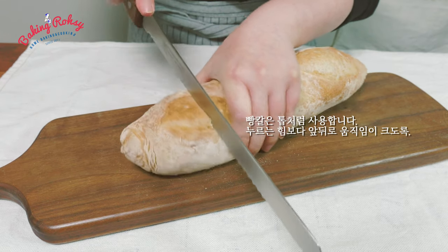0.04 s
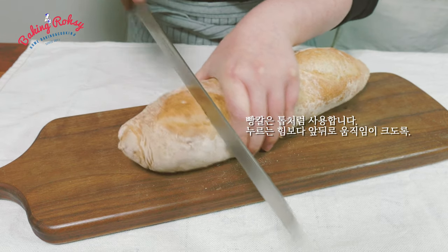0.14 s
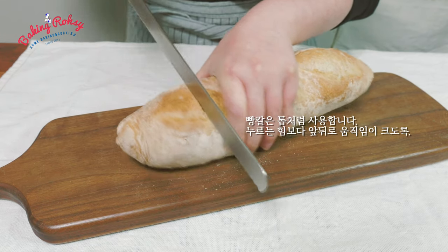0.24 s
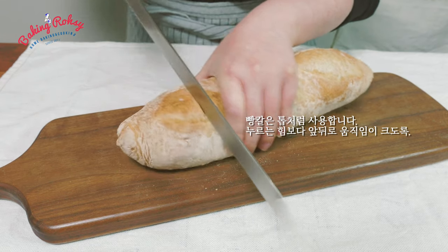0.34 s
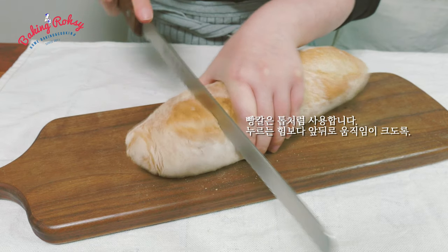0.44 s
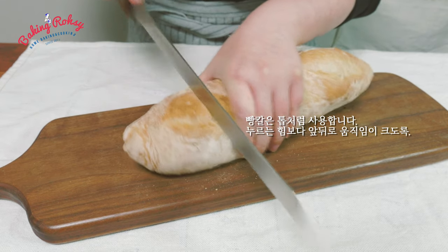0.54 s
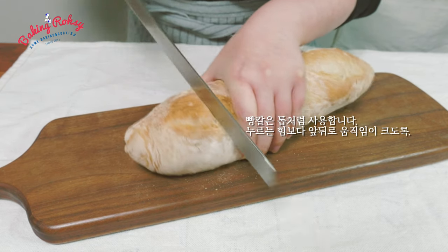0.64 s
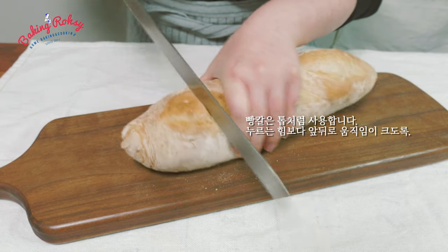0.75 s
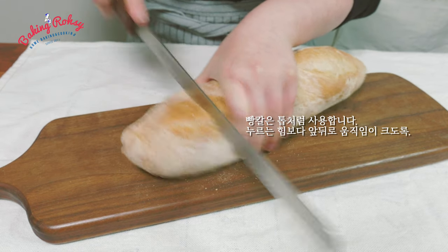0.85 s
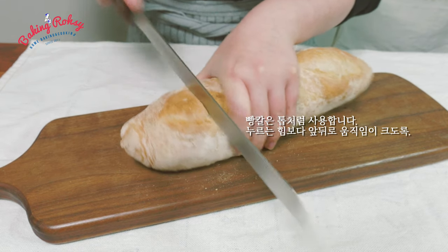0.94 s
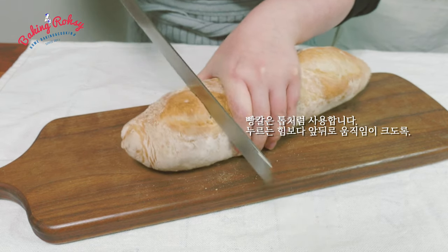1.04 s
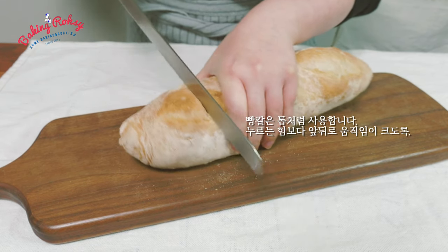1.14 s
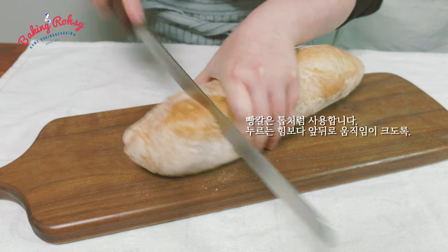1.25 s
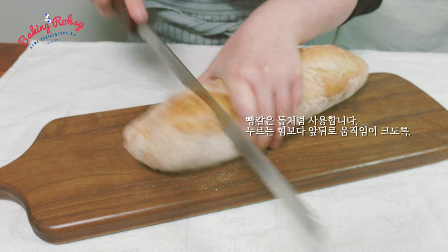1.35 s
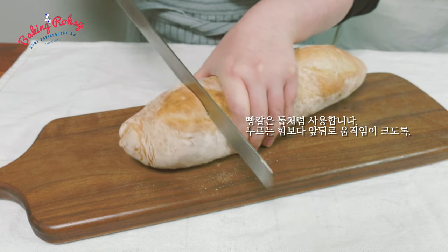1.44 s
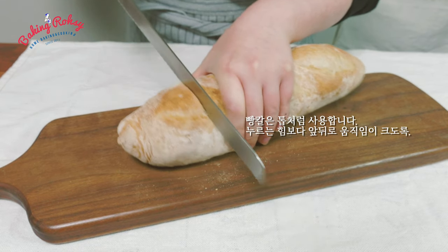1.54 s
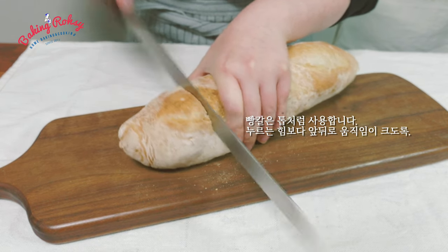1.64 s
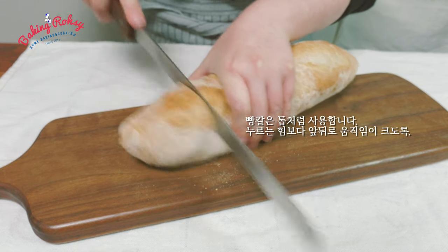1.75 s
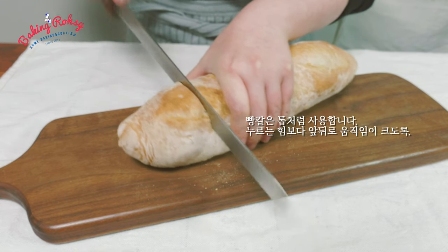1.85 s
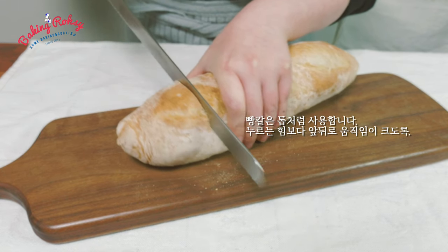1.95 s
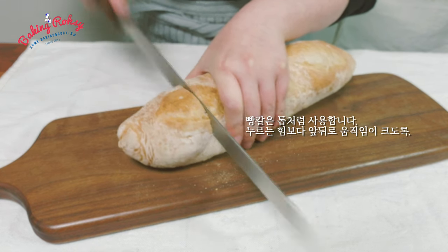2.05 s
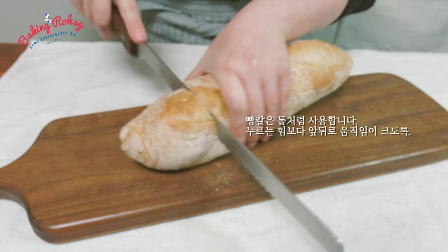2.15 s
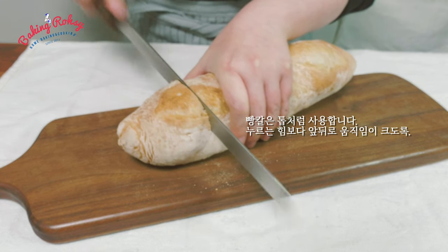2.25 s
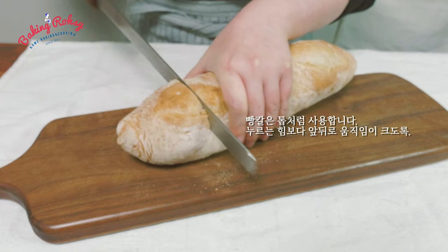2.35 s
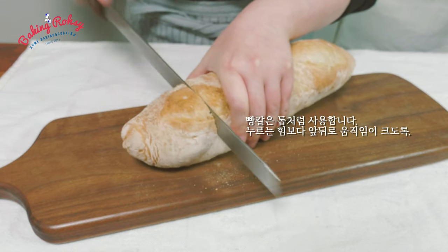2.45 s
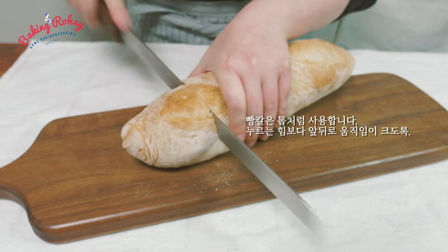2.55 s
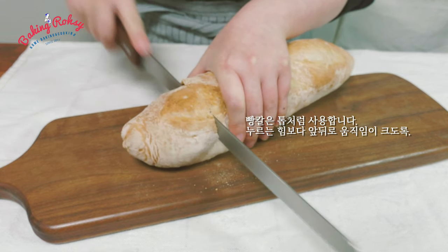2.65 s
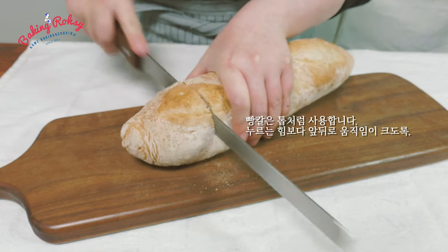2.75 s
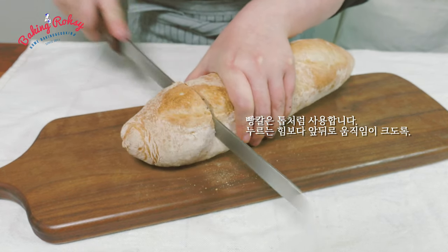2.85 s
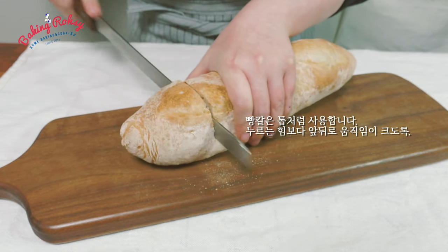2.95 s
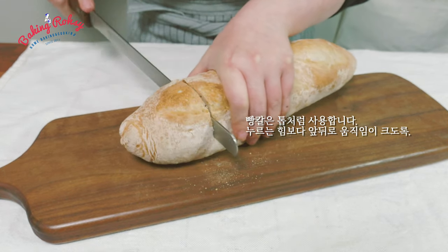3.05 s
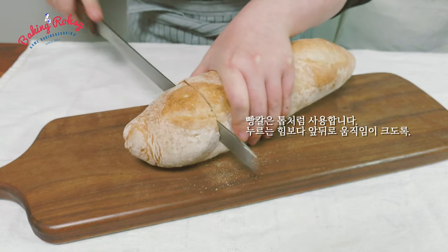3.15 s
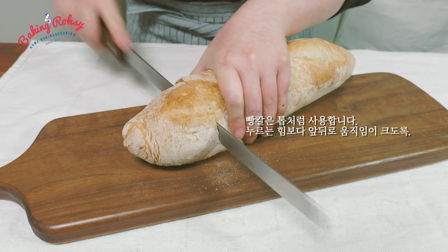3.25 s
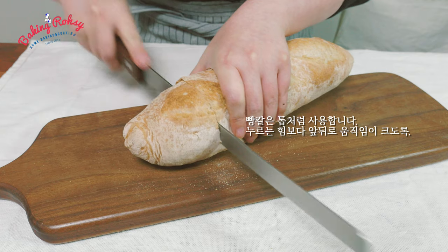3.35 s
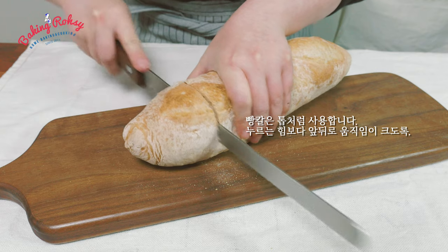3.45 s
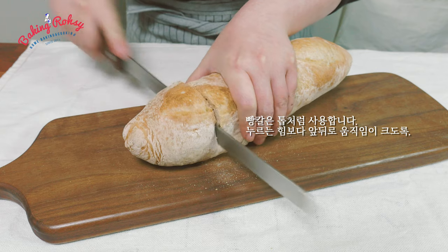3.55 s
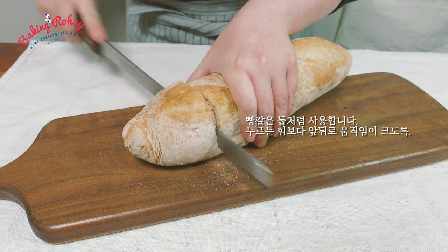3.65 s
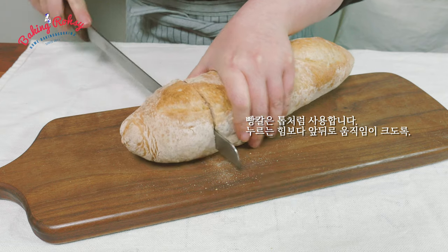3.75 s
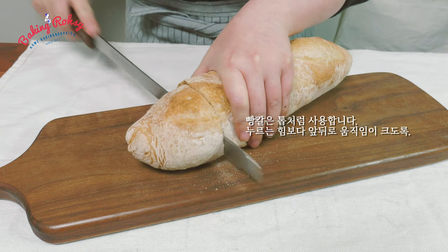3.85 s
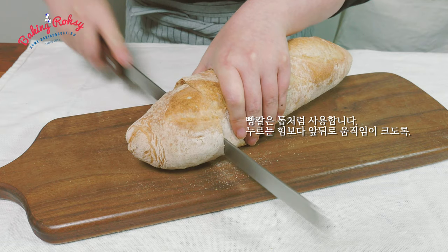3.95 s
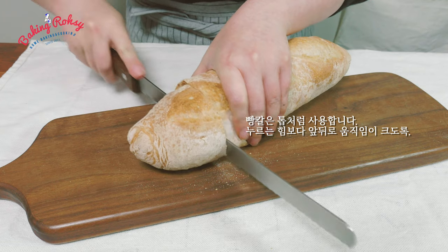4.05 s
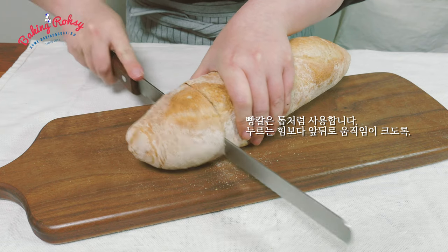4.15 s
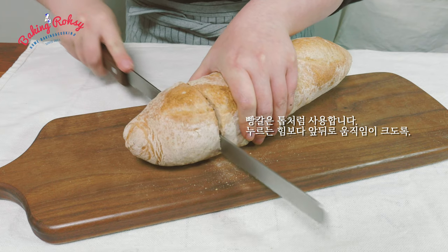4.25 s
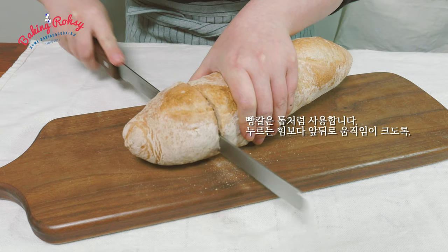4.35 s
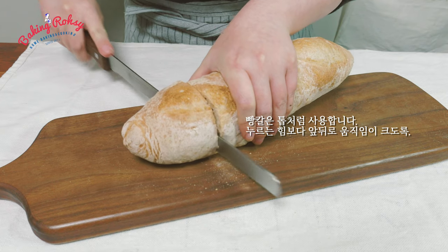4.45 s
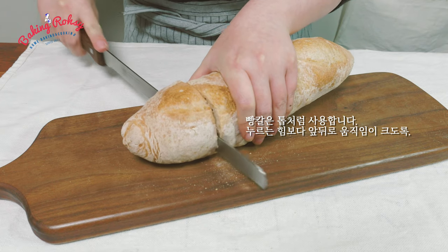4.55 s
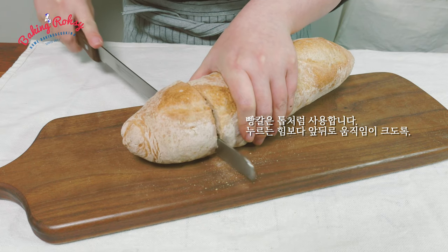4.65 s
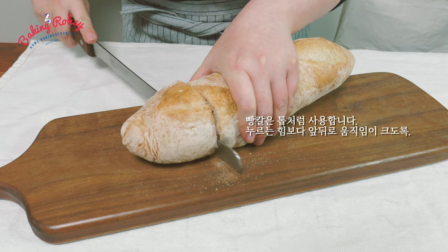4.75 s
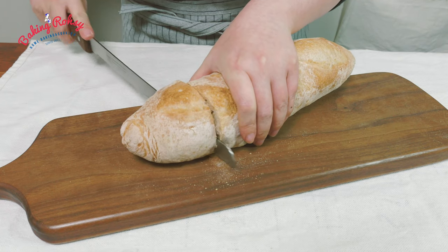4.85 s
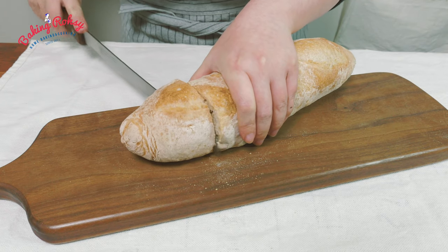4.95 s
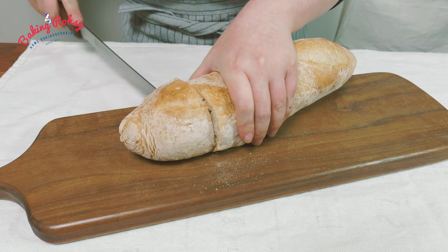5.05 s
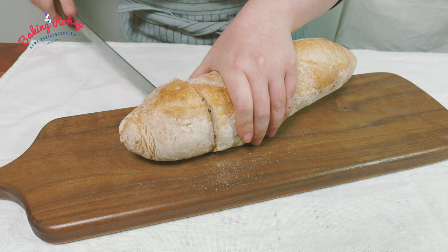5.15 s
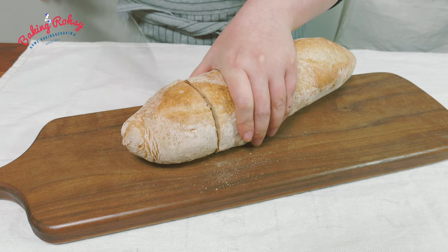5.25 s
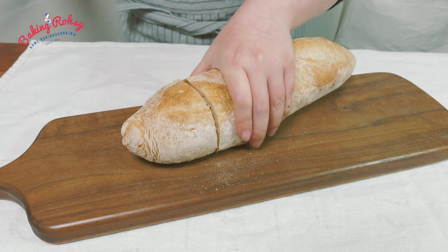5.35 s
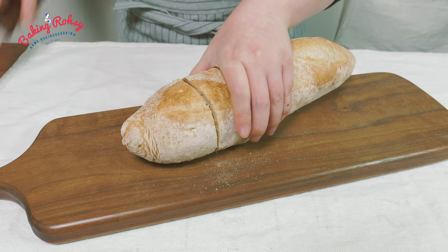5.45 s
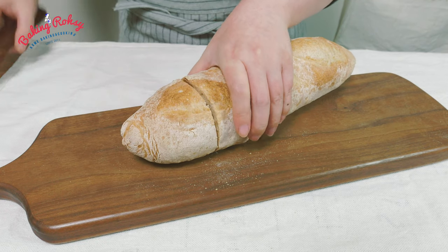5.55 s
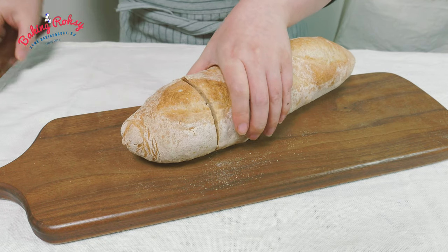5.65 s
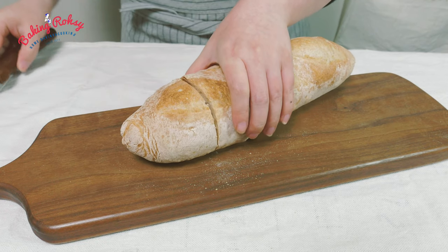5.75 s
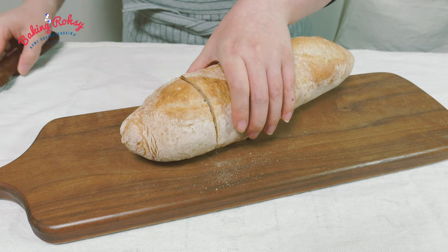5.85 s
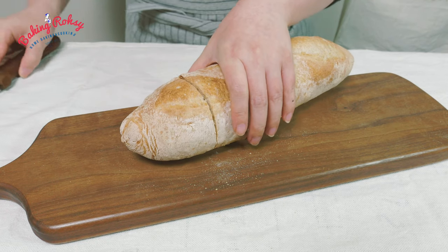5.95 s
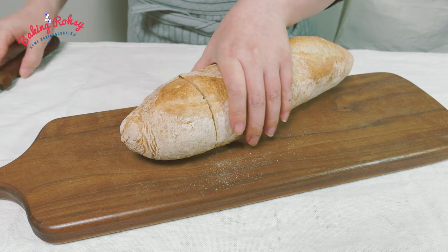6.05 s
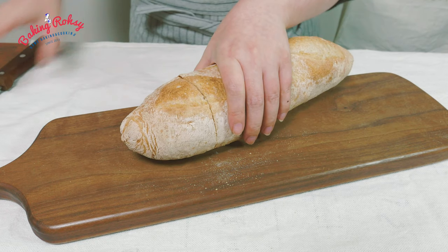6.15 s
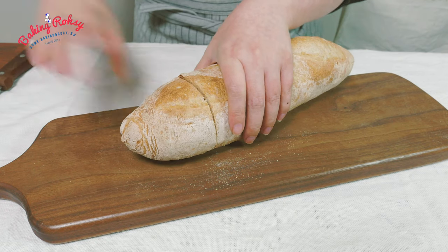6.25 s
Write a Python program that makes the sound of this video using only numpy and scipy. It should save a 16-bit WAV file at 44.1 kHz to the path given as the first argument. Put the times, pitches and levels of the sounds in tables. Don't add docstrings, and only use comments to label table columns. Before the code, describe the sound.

A serrated knife saws back and forth through a crusty loaf with dry crackling scrapes, then is laid down with two wooden knocks.

```python
import sys
import numpy as np
from scipy import signal
from scipy.fft import rfft, irfft, next_fast_len
from scipy.io import wavfile
from scipy.ndimage import uniform_filter1d, minimum_filter1d

SR = 44100
rng = np.random.default_rng(int(sys.argv[2]) if len(sys.argv) > 2 else 0)


def how_loud(loudness_db):
    steps = np.asarray(loudness_db, float) / 20
    return 10 ** steps


def wav_out(sig):
    wavfile.write(sys.argv[1], SR, np.round(np.clip(np.atleast_2d(sig).T, -1, 1) * 32767).astype(np.int16))


N = 278271

# [f/Hz, level/dB per Hz]
HUM = [(15, -75), (25, -32), (100, -11), (149, -1), (253, -13.5), (320, -12), (388, -5.5), (490, -10.5),
       (546, -0.5), (610, -13.5), (1010, -18.5), (6520, -37.5), (14500, -43)]
HUM_DB = -59.5
# [f/Hz, time to fall 60 dB/s]
KITCHEN_T60 = [(200, 0.15), (1000, 0.2), (4000, 0.17), (12000, 0.04)]

# [t/s, f/Hz, level/dB]
CRUST_GROAN = [
    (3.935, 293, -62),
    (3.955, 293, -33),
    (4.01, 272, -42.5),
    (4.045, 272, -51),
    (4.07, 264, -31.5),
    (4.09, 272, -60),
    (4.125, 326, -33.5),
    (4.19, 307, -78),
]
# [t/s, f/Hz, level/dB]
BOARD_HUM = [
    (3.935, 202, -62),
    (3.954, 204.6, -44),
    (4.02, 184.7, -42),
    (4.11, 184, -46),
    (4.15, 189, -64),
]
# [t/s, f/Hz, level/dB]
TABLE_SETTLE = [
    (6.19, 270, -67),
    (6.21, 263, -48),
    (6.235, 258, -47),
    (6.285, 256, -73),
]
# [t/s, f/Hz, level/dB]
LOAF_SONGS = [
    [(0.03, 585, -46), (0.05, 516, -33), (0.058, 495, -45), (0.068, 486, -28), (0.08, 482, -46),
     (0.1, 502, -46)],
    [(1.72, 447, -53), (1.748, 528, -41), (1.766, 510, -48), (1.774, 554, -46), (1.786, 550, -41),
     (1.82, 590, -61)],
    [(2.1, 560, -54), (2.122, 524, -53), (2.134, 567.6, -45), (2.238, 563, -37.5), (2.258, 564, -43),
     (2.28, 514, -56)],
    [(2.85, 551, -50), (2.884, 557, -37), (2.9, 509.5, -42), (3.014, 528, -40), (3.074, 523, -44),
     (3.1, 545, -53)],
]
# [t/s, f/Hz, level/dB]
CRUMB_SQUEAK = [
    (3.57, 798, -48),
    (3.588, 847, -34),
    (3.656, 779.2, -42),
    (3.7, 752, -42),
    (3.726, 870, -41),
    (3.78, 752.4, -53),
]

# [t/s, peak level/dB, rattle length/s, tilt/dB per octave, free ringing/s]
FIRST_KNOCK = [
    (5.6132, -7, 0.013, 1, 0.048),
    (5.644, -21, 0.0091, -2, 0.035),
]
SECOND_KNOCK = [
    (6.037, -32, 0.0056, -5, .1),
    (6.0415, -15, 0.0096, 1, .028),
    (6.095, -24, 0.012, 1, 0.018),
    (6.125, -25.5, 0.0058, -3, 0.0091),
    (6.176, -48, 0.0086, -2, .1),
]
# [t/s, peak level/dB, rattle length/s, tilt/dB
# per octave, free ringing/s]
MORE_BLOWS = [
    (5.6103, -42, .003, 1, .01),
    (5.624, -20, 0.0053, -8, 0.046),
    (6.1015, -36.5, .002, 7.5, 0.0084),
    (6.109, -38, .004, 8, 0.017),
    (6.142, -36, 0.012, -2, 0.045),
    (5.663, -40, .006, -0.5, 0.033),
    (6.072, -28, .012, 2.5, 0.033),
    (6.161, -38, 0.011, -1, 0.018),
    (6.198, -44, .01, -4, .04),
]
# [f/Hz, level/dB, time to fall 60 dB/s]
TABLE_MODES = [(272, -7, 0.31), (773, -7, 0.17), (870, -12, 0.091), (1040, -16, 0.19), (1039, -3, 0.18),
               (1500, -11, 0.1), (1686, -10, 0.14), (2130, -22, 0.08), (2410, -10, 0.07), (2580, -9, 0.059),
               (2960, -7, 0.046), (3260, -6, 0.04), (3980, -22, 0.065), (6436, -8, 0.032)]
HANDLE_MODES = [(1066, 4, 0.27), (1130, 2.5, 0.16), (1530, 2, 0.055), (1593, -2, 0.047), (1880, -12, 0.5),
                (2370, -12, 0.12), (2550, -4.5, 0.24), (2950, 1.5, 0.062), (3255, -1, 0.03),
                (3840, -17, 0.055), (3430, 2, 0.045), (4265, -20, 0.14), (5620, -10, 0.068),
                (455, -3, 0.095)]
# [f/Hz, time to fall 60 dB/s]
CLACK = [(60, -48), (150, -44), (270, -2), (635, -6.5), (1060, -11.5), (1700, -8), (3500, -8.5),
         (6500, -20.5), (10000, -14.5), (13000, -28), (14500, -74)]
CLACK_T60 = [(200, 0.11), (1000, 0.25), (2000, 0.14), (3500, 0.057), (7000, 0.13), (12000, 0.07)]
CHOKE_DB_PER_S, CHOKE_DB = 1200, 8
KNOCK_ROOM_DB = -5

# [t/s, peak level/dB, f/Hz, low thump level/dB]
CRACKS = [(0.022, -14, 3300, -6), (0.079, -5, 2580, -22), (0.0833, -21, 2600, -13), (0.4222, -27, 1880, 0),
          (0.4245, -20, 1880, 7), (0.4385, -26, 2930, -7), (0.4592, -4.5, 1450, -15),
          (0.5049, -7.5, 1500, -14), (0.645, -17, 3040, 1), (.838, -22, 1830, -5), (0.8618, -13, 1100, -7),
          (0.852, -22, 1880, -11), (0.9014, -14, 2940, -3), (1.062, -29, 2920, -13),
          (1.252, -21.5, 1840, -9), (1.2652, -19, 1270, -12), (1.289, -12, 2100, -12),
          (1.5285, -20, 3270, -10), (1.555, -11, 2860, -19), (1.573, -12, 3030, 2),
          (1.6612, -17.5, 3060, -6), (1.6945, -15, 3080, 0), (1.6971, -8, 2370, 5.5),
          (1.725, -28, 3200, -12), (1.864, -25, 2940, -5), (1.8828, -25, 2650, 3),
          (2.0911, -27.5, 1520, -5), (2.15, -20, 2370, -1), (2.18, -19, 1880, -11), (2.303, -22, 2400, -11),
          (2.525, -28, 2920, -12), (2.539, -21.5, 1350, -17), (2.5661, -17.5, 2680, -27),
          (2.82, -28, 3410, 7), (2.864, -25, 2950, -9), (3.046, -30, 2050, -17), (3.195, -32, 2630, -2),
          (3.2076, -21, 1400, 11), (3.237, -17.5, 2620, 5), (3.372, -14.5, 1860, -15),
          (3.548, -23, 2140, -10), (3.573, -21, 1870, -6), (3.9152, -21, 1530, -10), (3.951, -25, 2100, -8),
          (4.0618, -23, 2630, 16), (4.312, -31, 2670, -16), (4.4886, -29, 2450, -11),
          (4.522, -13, 1880, -12), (5.3318, -33, 3200, -6), (5.028, -29, 1800, -8),
          (5.4855, -32, 1880, 9.5)]
SPLINTER_S = .0026
# [f/Hz, level/dB]
SOFT_EDGE = [(5000, 0), (9000, -5), (13000, -18)]
# [f/Hz, level/dB]
LOW_CUT = [(20, -19), (120, -11), (190, -6), (15000, -4.5)]

# [hardest bite t/s, bite level/dB, sag until the lift/dB, weight on the loaf/dB, crumb fizz level/dB]
STROKES = [(0.066, -30.5, 11.5, 4.5, -10), (.25, -47, 10, 2, -8), (0.482, -33, 15, -4, -9),
           (0.679, -40.5, 8.5, 2.5, -7), (.9, -33.5, 0.5, 2.5, -8.5), (1.078, -41.5, 11, -6.5, -7),
           (1.33, -35.5, -1, 1.5, -9.5), (1.56, -43, 16, -2, -7), (1.7, -35.5, 9, -0.5, -10),
           (1.92, -42.5, 4.5, -1, -7), (2.15, -41.5, -1, 2, -8), (2.33, -39.5, 13, 2.5, -5.5),
           (2.6, -42, 6.5, 3, -4.5), (2.88, -37.5, 6.5, 3, -8), (3.29, -36, 12, -0.5, -7),
           (3.61, -33.5, 16, -5, -9), (3.967, -35.5, 8.5, -3, -8.5), (4.48, -37, 26, -9, -11.5),
           (5.11, -46.5, 9, -7, -11), (5.27, -53, 6, 3.5, -8), (5.5, -62, 4, 3, -6.5),
           (5.63, -74, 23, 10, -3), (6.15, -79, -9, 0, -20)]
# [t/s, level/dB, slowing before/s, time until the teeth grip/s]
TURNS = [(0.0, -42, .04, 0.031), (0.181, -44.5, 0.087, 0.032), (0.407, -57, 0.039, 0.03),
         (0.598, -39.5, 0.037, 0.061), (0.819, -46.5, 0.11, 0.042), (1.013, -38.5, 0.1, 0.036),
         (1.237, -43.5, 0.061, 0.03), (1.428, -38, 0.071, 0.045), (1.64, -41, 0.033, 0.038),
         (1.832, -42, 0.042, 0.062), (2.071, -47, 0.058, 0.039), (2.276, -41.5, 0.058, 0.038),
         (2.509, -52.5, 0.053, 0.04), (2.812, -44.5, 0.04, 0.049), (3.175, -51.5, 0.096, 0.051),
         (3.532, -47, 0.042, 0.059), (3.881, -44, 0.069, 0.06), (4.221, -48.5, 0.088, 0.088),
         (4.902, -45, 0.013, 0.035), (5.178, -46, 0.037, 0.091), (5.385, -53.5, 0.05, 0.097),
         (5.6, -61, .03, 0.014), (5.9, -81, .05, 0.083), (6.31, -97, 0.058, .05)]
GRIND_DB = [0, 0, 0, 0, 0, 0, -1, 0, 0, 0, 0, 0, 0, 0, 0, 0, 0, 1, 0, 0, 0, 0, 0]
# [push level/dB, pull level/dB]
GRIP_DB = (-2.5, 1.5)
# [push level/dB, pull level/dB]
SNAP_DB = (-1, -1)
SNAP_S = 0.0029
# [level/dB, extra at a stall/dB, extra at the grip/dB, share of the sag, lag of the bite/s]
FOLLOW = [
    (-3, -14, -1, 0.62, 0.0053),
    (-7.5, -12.5, -1.5, 0.52, 0.0355),
    (-3, -14.5, 1, 0.74, -0.0076),
    (2.5, -16.5, -1.5, 0.71, 0.0023),
    (-6, -13.5, -2.5, 0.66, -0.036),
]
# [snaps/per s, spread of size/dB, flicker/dB]
TEARING = [
    (3900, -1, -1.23),
    (892, 0, 0.5),
    (1830, 2, 1.5),
    (7110, -4, -0.14),
    (2920, 1, -0.5),
]
# [f/Hz, level/dB per Hz]
CRACKLE = [(40, -28), (1700, -11.5), (2200, -2.5), (2600, -4), (3300, -4.5), (3800, -11), (4500, -14.5),
           (5500, -20), (7000, -39)]
THRUM = [(20, -61), (120, -4), (165, -12.5), (187, -1), (215, -13.5), (280, 3.5), (330, 0), (400, 1),
         (480, -41.5)]
SCRAPE = [(40, -26.5), (300, -23), (420, 1.5), (530, 3.5), (700, 0.5), (900, 3.5), (1150, -4.5),
          (1450, -56)]
FIZZ = [(3700, -7), (4600, -2.5), (5500, -6.5), (6500, -2.5), (7700, -9.5), (9300, -7), (10200, -5.5),
        (11500, -12.5), (13500, -21), (14600, -72)]
GRIND = [(40, -29), (950, -10.5), (1250, 9), (1900, 8.5), (2400, -31.5)]
# [t/s, length/s, scrape
# level/dB, thrum level/dB]
PRESSES = [(.067, .006, -34, -40), (.125, .008, -45, -48), (.577, 0.005, -55, -53), (.868, 0.016, -35, -50),
           (.928, .008, -46, -40), (1.149, .008, -50, -49), (1.288, 0.0075, -40, -38),
           (1.595, 0.0068, -41.5, -42), (2.696, 0.0078, -54, -42), (3.007, .012, -35, -50),
           (3.832, .008, -48, -51), (3.905, .008, -49, -50), (5.194, 0.0065, -56, -52),
           (0.267, 0.021, -40, -40), (0.335, 0.014, -62, -52), (0.464, 0.02, -34, -36),
           (0.502, 0.0057, -32.5, -27.5), (0.686, 0.03, -38.5, -64), (0.895, 0.02, -56, -33),
           (1.101, 0.037, -43, -45), (1.296, 0.016, -43, -51), (1.317, 0.022, -50, -31.5),
           (1.757, 0.021, -39.5, -36.5), (1.954, 0.024, -38, -42.5), (2.156, 0.026, -45, -36.5),
           (2.213, 0.017, -37.5, -34.5), (2.347, 0.012, -42, -43.5), (2.644, 0.028, -42, -42),
           (3.017, 0.086, -48, -47.5), (3.678, 0.069, -34, -41), (3.748, 0.045, -45, -38.5),
           (4.082, 0.068, -42.5, -43), (4.345, 0.035, -37.5, -42.5), (4.494, 0.024, -35, -66),
           (4.397, 0.07, -48, -69), (4.605, 0.088, -42, -50.5), (4.763, 0.018, -49, -55),
           (4.803, 0.013, -44, -68), (4.869, 0.019, -46.5, -48.5), (4.944, 0.018, -46, -52),
           (4.994, 0.021, -45, -48), (5.045, 0.012, -44, -65), (5.054, 0.014, -44, -51),
           (5.105, 0.011, -38.5, -51), (5.14, 0.016, -55, -57), (5.477, 0.0071, -64, -64)]
PRESS_GRIND_DB = -20.5
OUT_S, OUT_GRIND_DB = 4.7, 14.5
THROUGH_S, THROUGH_DB = 4.22, 0.5
# [t/s, length/s, crackle
# level/dB, fizz level/dB]
BRUSHES = [
    (4.78, 0.063, -56, -64),
    (4.88, .012, -54, -63),
    (4.943, 0.0071, -46, -58),
    (5.065, 0.016, -53, -60),
    (5.117, 0.012, -51, -57),
    (5.335, 0.0098, -64, -75),
    (5.54, 0.021, -72, -66.5),
    (5.767, 0.023, -82, -71),
    (5.94, 0.045, -71.5, -69),
    (5.99, 0.014, -75, -68),
]
RASP_DB = .9
# [f/Hz, level/dB]
TOP_CRUST = [(8500, 0), (11000, -2), (14000, -2)]
TOP_CRUST_S = 1.1

# [f/Hz, level/dB]
NEAR = [(100, 1.5), (3000, 6.5), (8700, 4), (9300, -7.5), (9800, -38)]
# [f/Hz, level/dB]
WIDTH = [(25, -25), (80, -25), (140, -16.5), (300, -17.5), (600, -14.5), (1500, -7.5), (3000, -8),
         (6000, -7), (9000, -6.5), (12000, -4), (14000, -12)]
# [f/Hz, level/dB]
BOUNCE = [(100, 12), (880, 1.5), (2650, -3), (6000, -6), (12000, -11)]
FAR_LAG, TABLE_LAG = 166.4, 25
# [f/Hz, level/dB]
TREBLE_BAR = [(8000, -40), (9000, -14), (9450, -4), (9900, -14), (11300, -9), (11800, 0), (12300, 3.5),
              (12750, -4), (13300, -1), (13800, 5), (14300, 14)]
DIP_SHARE = .8


def evened(x):
    return x / np.sqrt(np.mean(x ** 2) + 1e-20)


def read(points, hz):
    f, value = np.transpose(points)
    return np.interp(np.log(hz + 1), np.log(f + 1), value)


def add(mix, s, sound):
    part = mix[round(s * SR):][:len(sound)]
    part += sound[:len(part)]


def colour(x, points):
    log_gain = np.log(how_loud(read(points, abs(np.fft.fftfreq(8192, 1 / SR)))))
    response = np.exp(np.conj(signal.hilbert(log_gain)))
    taps = np.fft.ifft(response).real[:4096]
    return signal.oaconvolve(x, taps)[:len(x)]


def late(x, count, points):
    size = next_fast_len(len(x) + 2048)
    hz = np.fft.rfftfreq(size, 1 / SR)
    delay = np.exp(-2j * np.pi * hz * count / SR)
    return irfft(rfft(x, size) * how_loud(read(points, hz)) * delay, size)[:len(x)]


def patchy(x, patch_db):
    z = signal.stft(x, nperseg=512)[2]
    blotches = uniform_filter1d(rng.standard_normal(z.shape), size=7, axis=0)
    blotches = evened(uniform_filter1d(blotches, size=5, axis=1))
    gain = how_loud(patch_db * blotches - 0.2 * patch_db ** 2)
    return signal.istft(z * gain, nperseg=512)[1][:N]


def air():
    hum = evened(colour(rng.standard_normal(N), HUM))
    return how_loud(HUM_DB - 1) * patchy(hum, patch_db=2.5)


def kitchen_echo():
    taps = np.zeros(SR // 2)
    at = np.arange(200, SR // 2 - 20, 20)
    at = at + rng.integers(0, 20, len(at))
    taps[at] = rng.choice([-1., 1.], len(at))
    hz, t, z = signal.stft(taps, SR, nperseg=256)
    decay = how_loud(-60 * t / read(KITCHEN_T60, hz)[:, None])
    out = signal.istft(z * decay, SR, nperseg=256)[1]
    return out / np.linalg.norm(out)


def groan(curve, trim_db):
    s, hz, level_db = np.transpose(curve)
    t = np.arange(s[0], s[-1], 1 / SR)
    a, b = rng.standard_normal((2, len(t)))
    wobble = 1 + 8 * uniform_filter1d(a + 1j * b, size=900)
    phase = 2 * np.pi * np.cumsum(np.interp(t, s, hz)) / SR
    tone = (wobble * np.exp(1j * phase)).real
    level = how_loud(np.interp(t, s, level_db) + trim_db)
    out = np.zeros(N)
    add(out, s[0], level * evened(tone) * signal.windows.tukey(len(t), .1))
    return out


def clack(rattle, dull_db):
    size = SR // 3
    noise = evened(colour(rng.standard_normal(size), CLACK))
    hz, since, z = signal.stft(noise, SR, nperseg=256)
    fade_db = 60 * np.maximum(since - rattle / 2, 0) / read(CLACK_T60, hz)[:, None]
    z = z * how_loud(dull_db * hz[:, None] / 10000 - fade_db)
    rise = np.minimum(np.arange(size) / SR / .004, 1)
    return signal.istft(z, SR, nperseg=256)[1][:size] * rise


def knock(blows, modes, ring_db, clack_db, first, dull_db):
    t, out = np.arange(SR // 3) / SR, np.zeros(N)
    pitch, db, decay = np.transpose(modes)[:, :, None]
    swing = np.exp(2j * np.pi * pitch * t)
    rings = how_loud(db - 60 * t / decay) * swing.imag
    for s, peak_db, rattle, tilt_db, free in blows:
        force = rng.standard_normal(len(t)) * np.exp(-(t / rattle) ** 2)
        contacts = force * (rng.random(len(t)) < .03)
        contacts[0] = first
        contacts = contacts / np.linalg.norm(contacts)
        share = 1 / np.clip(abs(swing @ contacts), .4, 3)
        tilt = how_loud(tilt_db * np.log2(pitch[:, 0] / 1000))
        rung = signal.oaconvolve(contacts, (share * tilt) @ rings)[:len(t)]
        rung = rung * how_loud(-np.clip(CHOKE_DB_PER_S * (t - free), 0, CHOKE_DB))
        add(out, s, how_loud(peak_db) * (how_loud(ring_db) * rung + how_loud(clack_db) * clack(rattle, dull_db)))
    return out


def cracks():
    out, t = np.zeros(N), np.arange(900) / SR
    for s, peak_db, hz, thump_db in CRACKS:
        chance = rng.random(len(t))
        splinters = (chance < .02) * np.cos(chance * 3000) * np.exp(-t / SPLINTER_S)
        splinters[0] = 1
        snap = np.sin(2 * np.pi * hz * t + .6) * how_loud(-60 * t / .0025)
        thump = np.sin(2 * np.pi * 620 * t) * how_loud(-60 * t / .012 + thump_db - 10)
        add(out, s + 0.000786, how_loud(peak_db - 3.5) * np.convolve(splinters, snap + thump))
    return colour(out, SOFT_EDGE)


def strokes(colour_db, swells, level_db, stall_db, grip_db, sag_share, lag_s):
    turn, still_db, slow, grip = np.transpose(TURNS)
    bite, bite_db, sag_db = np.transpose(STROKES)[:3]
    way = np.arange(len(STROKES)) % 2
    gripped = (turn + grip)[:-1]
    top_db = bite_db + colour_db + level_db
    low_db = still_db[:-1] + colour_db + level_db + stall_db
    held_db = top_db + np.take(GRIP_DB, way) + grip_db
    before_db = np.maximum(held_db + np.take(SNAP_DB, way), low_db)
    s = [turn[:-1], gripped - SNAP_S, gripped, bite + lag_s, (turn - slow)[1:]]
    db = [low_db, before_db, held_db, top_db, top_db - sag_share * sag_db]
    s = np.maximum.accumulate(np.append(np.transpose(s), turn[-1]))
    db = np.append(np.transpose(db), still_db[-1])
    t = np.arange(N) / SR
    power = how_loud(2 * np.interp(t, s, db))
    around = t[:SR * 2 // 5] - .2
    for at, length, swell_db in swells:
        add(power, at - .2, how_loud(2 * swell_db) * np.exp(-(around / length) ** 2))
    return np.sqrt(power)


def sawing():
    bite_s, _, _, weight_db, fizz_db = np.transpose(STROKES)
    thrum_db = weight_db + THROUGH_DB * (bite_s > THROUGH_S)
    press_s, press_length, press_scrape, press_thrum = np.transpose(PRESSES)
    brush_s, brush_length, brush_crackle, brush_fizz = np.transpose(BRUSHES)
    press_grind = press_scrape + PRESS_GRIND_DB + OUT_GRIND_DB * (press_s > OUT_S)
    drives = [(0, np.transpose([brush_s, brush_length, brush_crackle])),
              (thrum_db, np.transpose([press_s, press_length, press_thrum])),
              (weight_db, np.transpose([press_s, press_length, press_scrape])),
              (fizz_db, np.transpose([brush_s, brush_length, brush_fizz])),
              (np.array(GRIND_DB), np.transpose([press_s, press_length, press_grind]))]
    shapes = CRACKLE, THRUM, SCRAPE, FIZZ, GRIND
    out = np.zeros(N)
    clumps = evened(uniform_filter1d(uniform_filter1d(rng.standard_normal(N), 300), 200))
    ticks = (rng.random(N) < 350 / SR) * rng.standard_normal(N)
    for drive, law, shape, (per_s, spread_db, flicker_db) in zip(drives, FOLLOW, shapes, TEARING):
        torn = rng.random(N) < per_s / SR
        size = np.minimum(rng.exponential(1, N), 4)
        snaps = torn * rng.standard_normal(N) * how_loud(spread_db * size + flicker_db * clumps)
        snaps = evened(snaps) + .38 * evened(ticks)
        out += how_loud(-2.5) * strokes(*drive, *law) * evened(colour(snaps, shape))
    top = np.clip(2 - 2 * np.arange(N) / SR / TOP_CRUST_S, 0, 1)
    out = (1 - top) * out + top * late(out, count=0, points=TOP_CRUST)
    rasp = evened(uniform_filter1d(uniform_filter1d(rng.standard_normal(N), size=160), size=120))
    return patchy(out * how_loud(RASP_DB * rasp - .12 * RASP_DB ** 2), patch_db=1.7)


def scene():
    snaps = colour(cracks(), LOW_CUT)
    sharp = knock(FIRST_KNOCK, TABLE_MODES, ring_db=-16.5, clack_db=-20.0, first=4.4, dull_db=-6.5)
    sharp += knock(SECOND_KNOCK, HANDLE_MODES, ring_db=-16.5, clack_db=-14.5, first=1.8, dull_db=1.0)
    dry = sawing() + snaps + air()
    dry += groan(CRUST_GROAN, trim_db=-4) + groan(BOARD_HUM, trim_db=-3) + groan(TABLE_SETTLE, trim_db=-7)
    room = kitchen_echo()
    sharp += knock(MORE_BLOWS, HANDLE_MODES, ring_db=-17.5, clack_db=-22.0, first=2.0, dull_db=-6.0)
    sharp = colour(sharp, LOW_CUT)
    for song in [*LOAF_SONGS, CRUMB_SQUEAK]:
        dry += groan(song, trim_db=-6.5)
    echoes = signal.oaconvolve(dry + how_loud(KNOCK_ROOM_DB) * sharp, room)[:N]
    heard = how_loud(-3.5) * (dry + sharp + how_loud(-13.0) * echoes)
    far = late(heard, count=FAR_LAG, points=[(20, 0), (20000, 0.01)])
    z = signal.stft(far, nperseg=512, noverlap=256)[2]
    z = z * np.exp(2j * np.pi * rng.random(z.shape))
    scattered = signal.istft(z, nperseg=512, noverlap=256)[1][:N]
    scattered = how_loud(-1) * (scattered + how_loud(-6) * signal.oaconvolve(scattered, kitchen_echo())[:N])
    bounced = late(scattered, count=TABLE_LAG, points=BOUNCE)
    side = late(scattered + bounced, count=0, points=WIDTH)
    return late(heard, count=0, points=NEAR) + far + np.array([side, -side])


def thinned(x):
    hz, _, z = signal.stft(x, SR, nperseg=1024, noverlap=768)
    power = uniform_filter1d((abs(z) ** 2).mean(0), size=9, axis=0)
    patch_db = 10 * np.log10(uniform_filter1d(power, size=5, axis=1) + 1e-16)
    luck = uniform_filter1d(rng.standard_normal(patch_db.shape), size=9, axis=0)
    luck_db = 3 * evened(uniform_filter1d(luck, size=5, axis=1))
    loud_db = patch_db[20:120].mean(0)
    usual_db = np.median(patch_db, 1) + read(TREBLE_BAR, hz)
    bar_db = usual_db[:, None] + .8 * (loud_db - np.median(loud_db))
    kept = 1 / (1 + how_loud(8 * np.clip(bar_db - patch_db + luck_db, -10, 10)))
    return signal.istft(z * kept, SR, nperseg=1024, noverlap=768)[1][:, :N]


def roll_off(x):
    return signal.sosfilt(signal.butter(12, 14840, fs=SR, output="sos"), x)


def record(dry):
    power_db = 10 * np.log10(abs(uniform_filter1d((dry ** 2).mean(0), 220)) + 1e-12)
    ahead_db = -minimum_filter1d(-power_db, size=600, origin=-299)
    dip_db = np.clip(ahead_db - power_db - 15, 0, 14)
    limited = dry / how_loud(DIP_SHARE * uniform_filter1d(dip_db, 60))
    return roll_off(thinned(limited))


dry = scene()
out = record(dry)
wav_out(out)
```